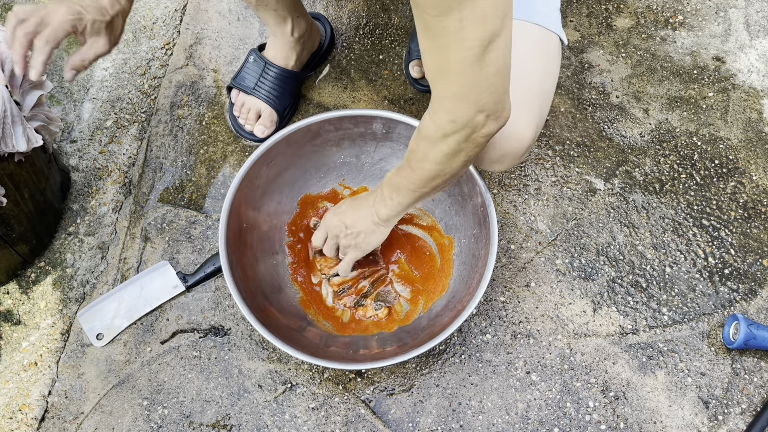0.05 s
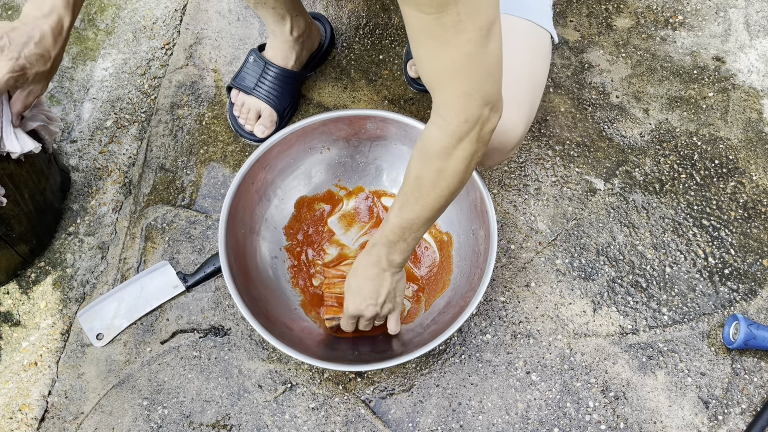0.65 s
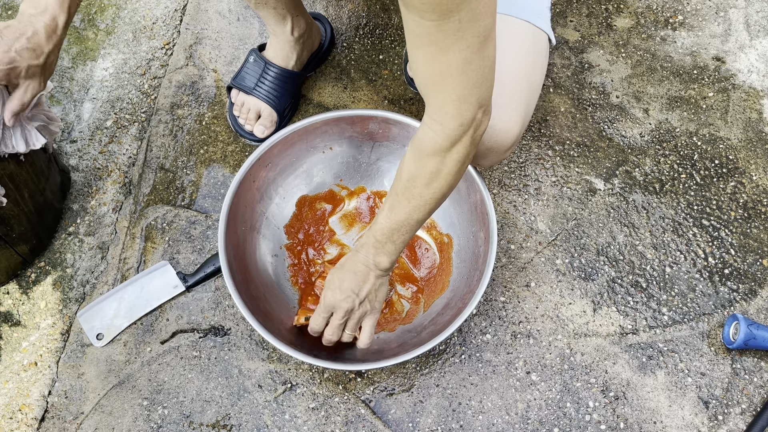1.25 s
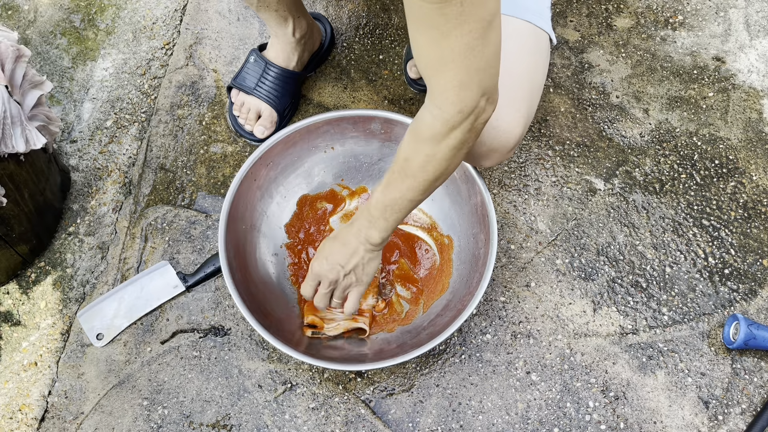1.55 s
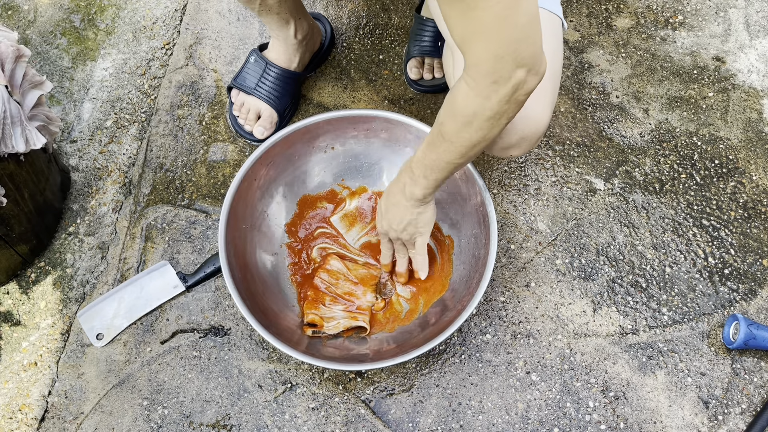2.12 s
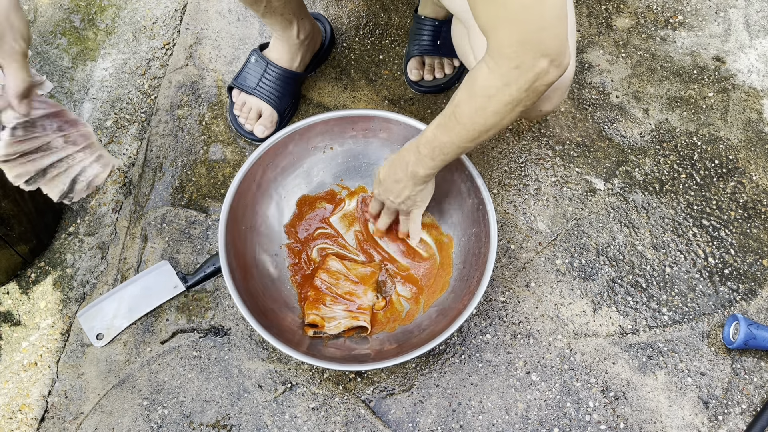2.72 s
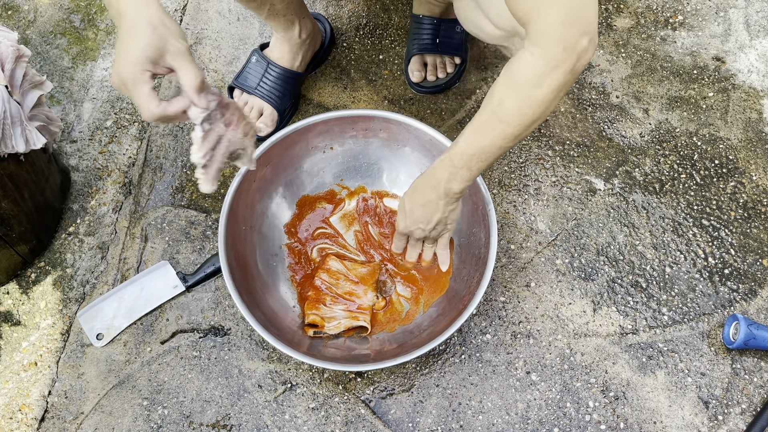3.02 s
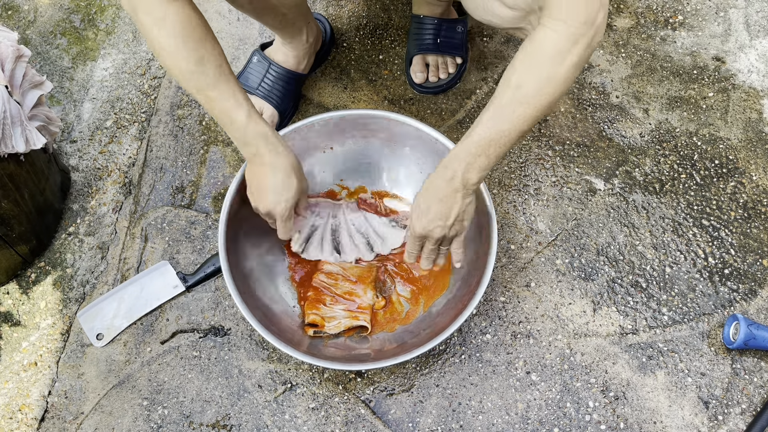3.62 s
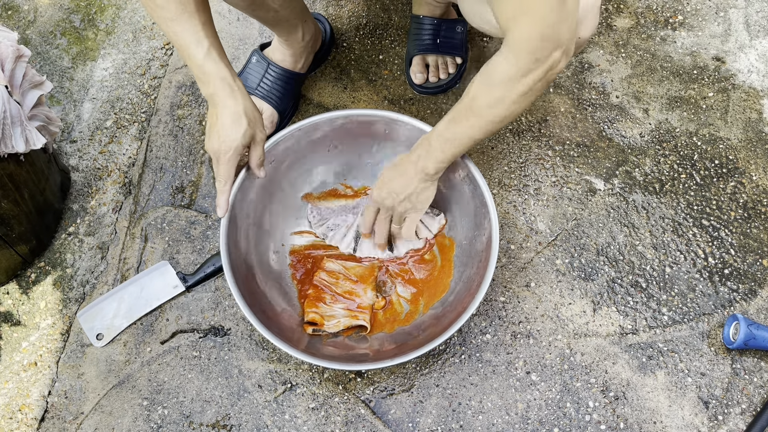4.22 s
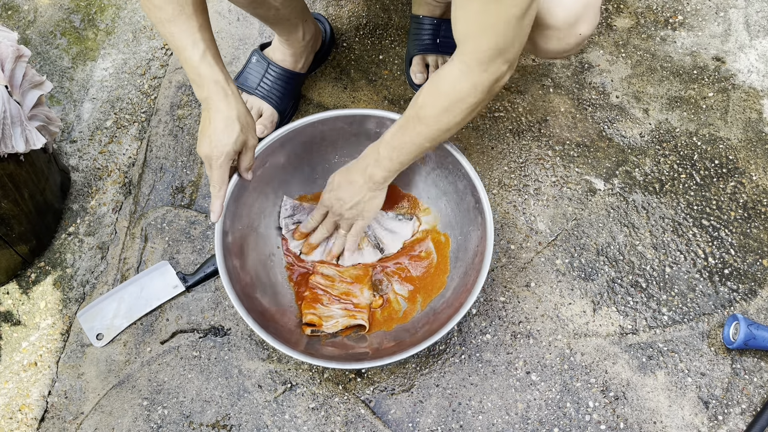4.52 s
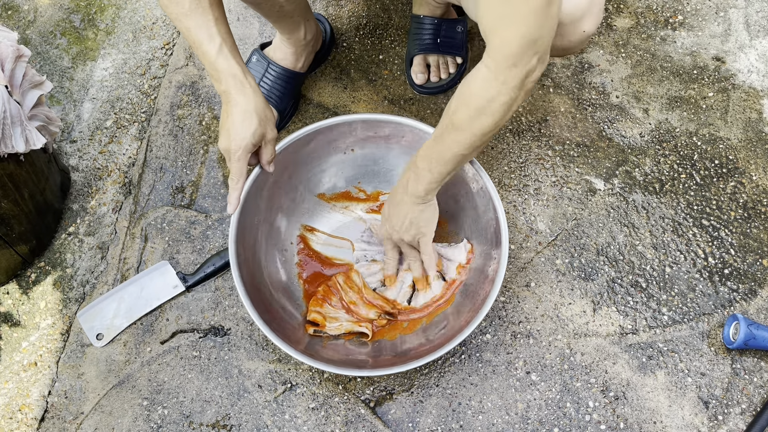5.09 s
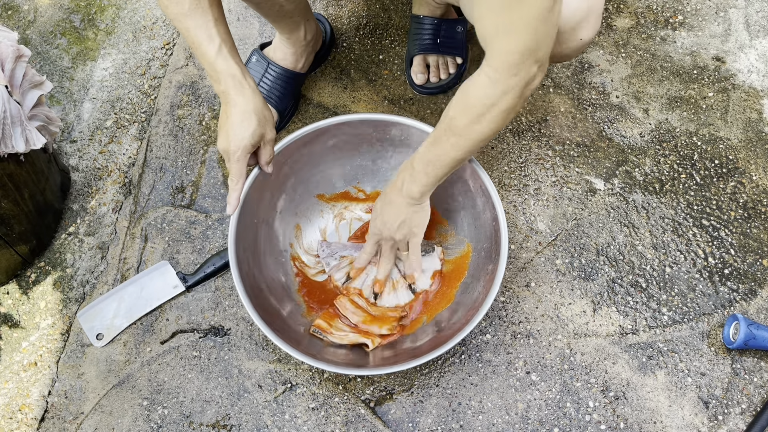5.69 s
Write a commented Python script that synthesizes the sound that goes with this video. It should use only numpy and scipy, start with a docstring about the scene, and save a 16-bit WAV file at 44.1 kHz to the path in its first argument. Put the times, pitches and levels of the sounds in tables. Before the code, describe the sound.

Outdoors, a microphone sits just above a wide steel bowl where hands turn fish slices in a wet marinade. A low rumble of open air and a faint, wavering distant engine run throughout. From the start, close sticky smacks, squelches and small air pops come irregularly, slightly to the left, each with a very short metallic ring. Sharper wet clicks stand out at about 0.6 and 0.9 seconds. High insects swell in the background after one second and fade by about 2.7. The hands ease to soft wet wipes around 2 seconds, then resume with a pop at 2.8. The loudest cluster of smacks and snaps lands at about 3.5 seconds. The insects return stronger by then, with a pulsing shrill and buzz that holds to the end. More squelches and pops follow, notably around 4.8 and 5 seconds, with a last pop near 5.6.

```python
"""Outdoors, a microphone just above a wide steel bowl, where hands turn fish slices in a wet marinade.
A distant engine drones from the start. Close up, sticky flesh smacks and squelches and trapped air pops,
each sound ringing briefly in the steel. Insects swell in the background after a second, and fade as
the hands ease off and resume. The loudest smacks come at about 3.5 s; the insects return stronger and
shrill on behind the last pops."""
import sys
import numpy as np
from scipy import signal
from scipy.fft import rfft, irfft, next_fast_len
from scipy.io import wavfile
from scipy.ndimage import uniform_filter1d, map_coordinates

SR = 44100
rng = np.random.default_rng(int(sys.argv[2]) if len(sys.argv) > 2 else 0)


def wav_record(signal):
    """Record a signal, one row per channel, as 16-bit PCM in the file named by sys.argv[1]."""
    frames = np.transpose(np.atleast_2d(signal))
    bounded = np.clip(frames, -1, 1)
    # unit amplitude maps onto the largest positive 16-bit level
    quanta = np.round(bounded * 32767).astype(np.int16)
    wavfile.write(sys.argv[1], SR, quanta)


N = 253575


def amp(db):
    """Decibels to gain."""
    return 10 ** (np.asarray(db) / 20)


def unit(x):
    """Scale to rms 1."""
    return x / np.sqrt(np.mean(x ** 2) + 1e-20)


def along(points, hz):
    """Interpolate (Hz, value) points on a log axis."""
    f, v = np.transpose(points)
    return np.interp(np.log(hz + 1), np.log(f + 1), v)


def curves(rows):
    """One value per sample for each column after the time."""
    s, *cols = np.transpose(rows)
    return [np.interp(np.arange(N) / SR, s, c) for c in cols]


def wobble(rate):
    """A smooth random curve, rate knots a second."""
    return map_coordinates(rng.standard_normal(2000), [np.arange(N) * rate / SR], mode="wrap")


def filtered(x, response):
    """Shape x by a response of frequency."""
    n = x.shape[-1]
    m = next_fast_len(n + 8192)
    return irfft(rfft(x, m) * response(np.fft.rfftfreq(m, 1 / SR)), m)[..., :n]


def lowpass(x, edge_hz, order):
    """Roll off the treble above an edge."""
    return filtered(x, lambda hz: 1 / (1 + (hz / edge_hz) ** order))


def sharpest_click(gain_db, size=1024):
    """The minimum-phase click with a given spectrum."""
    cepstrum = irfft(np.log(amp(gain_db(np.fft.rfftfreq(size, 1 / SR)))))
    cepstrum[1:size // 2] *= 2
    cepstrum[size // 2 + 1:] = 0
    return irfft(np.exp(rfft(cepstrum)))


def add(track, s, sound):
    """Mix a sound into a track at time s."""
    part = track[max(round(s * SR), 0):][:len(sound)]
    part += sound[:len(part)]


def stereo_noise(spectrum, side_db):
    """Noise of rms 1; (Hz, dB) points set its spectrum and its side level against the mid."""
    mid, side = filtered(rng.standard_normal((2, N)), lambda hz: amp(along(spectrum, hz)))
    side = filtered(side, lambda hz: amp(along(side_db, hz)))
    return unit(np.array([mid + side, mid - side]))


def off_centre(x, lead_samples):
    """The sound reaches the left microphone slightly before the right."""
    return filtered(x, lambda hz: np.exp(1j * np.pi * hz / SR * lead_samples * np.array([[1], [-1]])))


# The open air all around. Each row: frequency in Hz, relative level in dB.
AIR_SPECTRUM = [(20, -28), (35, -15.5), (55, -2), (90, -4.5), (135, -6), (180, -17), (300, -21.5),
                (700, -27), (1500, -37.5), (3500, -43.5), (7000, -54), (9000, -43), (10500, -85),
                (13000, -96)]


def outdoor_air():
    """A low rumble in the centre under a faint, wide hiss."""
    side_db = [(50, -31), (125, -13.5), (250, -10), (1000, 2), (8000, -3.5)]
    return amp(-48) * stereo_noise(AIR_SPECTRUM, side_db)


# An engine, far off. Each row: time in seconds, cycle rate in Hz, then the relative levels in dB
# of the drone and of its lowest note.
ENGINE_RUN = [(0, 37.94, -52, -62), (0.43, 36.38, -49, -39), (0.85, 37.28, -54.5, -57),
              (2.1, 37.81, -51.5, -52), (2.5, 37.89, -52, -73), (2.85, 38.57, -48.5, -80),
              (3.28, 38.24, -46.5, -56), (3.55, 38.23, -55, -53.5), (4.5, 38.6, -63.5, -46.5),
              (4.87, 37.54, -49.5, -53), (5.75, 37.6, -64, -52)]


def engine(waver_db=2.5, unsteady=0.011):
    """Only orders 2 to 5 of a far, unsteady engine carry, each wavering on its way."""
    cycle_hz, drone_db, lowest_db = curves(ENGINE_RUN)
    turns = np.cumsum(cycle_hz * (1 + unsteady * wobble(6))) / SR
    out = np.zeros(N)
    for order, db in [(2, lowest_db - 3), (3, drone_db + 1.5), (4, drone_db - 8), (5, drone_db - 16)]:
        level = np.sqrt(2) * amp(db + waver_db * wobble(12))
        out += level * np.sin(2 * np.pi * order * turns + .5 * wobble(10))
    return out


# The insects' phrases. Each row: end of the swell and start of the fade in seconds, relative levels
# of shrill and buzz in dB, whine pitch in Hz.
INSECT_PHRASES = [(1.4, 2.165, -61, -62.5, 7870), (2.9, 3.048, -70, -69.5, 8380),
                  (3.756, 5.748, -56, -63, 8360)]


def phrases(swell_s=0.72, fade_s=0.69, crescendo_db_per_s=3, chorus_db=-66.5):
    """Strength of shrill and buzz: phrases swell, grow while held and fade; a far chorus never stops."""
    t = np.arange(N) / SR
    shrill, buzz = np.zeros((2, N))
    for start, end, shrill_db, buzz_db, _ in INSECT_PHRASES:
        gate = np.clip(1 + (t - start) / swell_s, 0, 1) * np.clip(1 - (t - end) / fade_s, 0, 1)
        held = amp(crescendo_db_per_s * np.clip(t - start, 0, end - start))
        shrill += amp(shrill_db) * held * gate
        buzz += amp(buzz_db) * held * gate ** 2
    return np.hypot(shrill, amp(chorus_db)), buzz


# Each row: frequency in Hz, relative level in dB.
SHRILL_SPECTRUM = [(2500, -16), (4000, -13), (5500, -11), (6800, -7), (7600, -8), (8300, -7), (9000, -3),
                   (9600, -9), (10300, -17), (11300, -9.5), (12000, -43), (13000, -95)]


def far_insects(pulse_hz=20.8, whine_db=-7.5):
    """A high shrill swells and fades; a narrow, pulsing whine stands out as the song gets louder."""
    song, _ = phrases()
    whine_hz, = curves([(s, hz) for start, end, _, _, hz in INSECT_PHRASES for s in (start, end)])
    pulse = np.sin(2 * np.pi * np.cumsum(pulse_hz * (1 + .02 * wobble(3))) / SR)
    fuzz = unit(lowpass(rng.standard_normal(N), edge_hz=110, order=2))
    whine = np.sqrt(2) * fuzz * np.sin(2 * np.pi * np.cumsum(whine_hz) / SR) * (1 + 0.39 * pulse)
    effort = np.interp(20 * np.log10(song), [-65, -54], [0, 1])
    hiss = stereo_noise(SHRILL_SPECTRUM, side_db=[(4000, -3.5), (8000, -25)])
    shrill = unit(hiss + amp(whine_db) * effort * whine)
    return off_centre(shrill * song * amp(0.5) * (1 + 0.14 * pulse), lead_samples=1.305)


def resonances(modes, hz):
    """Summed response of (Hz, width Hz, dB) modes."""
    return sum(amp(db) * 1j * hz * width / (centre ** 2 - hz ** 2 + 1j * hz * width)
               for centre, width, db in modes)


# One insect nearer the microphone. Each row: centre and width in Hz, gain in dB, all before squaring.
BUZZ_MODES = [(2530, 130, 2.5), (3440, 90, -24), (4540, 150, -1), (5930, 270, 1), (6600, 320, 2.5),
              (7420, 450, 4), (7930, 320, 4)]


def near_insect():
    """A buzz in a few narrow bands comes and goes with the phrases."""
    _, song = phrases()
    bands = filtered(rng.standard_normal(N), lambda hz: abs(resonances(BUZZ_MODES, hz)) ** 2)
    buzz = unit(lowpass(bands, edge_hz=11000, order=24))
    return off_centre(buzz * song, lead_samples=0.26)


# The steel bowl's resonances. Each row: centre in Hz, width in Hz, relative gain in dB.
BOWL_MODES = [(421, 36, 7), (542, 67, -1.5), (717, 88, 5.5), (1210, 160, -10), (1810, 470, 0),
              (2870, 660, -0.5), (4030, 244, 7), (4600, 700, 4)]
# Its short ring. Each row: frequency in Hz, seconds to fall by 60 dB.
BOWL_DECAY = [(300, 0.071), (1700, 0.086), (3300, 0.09), (4400, 0.1), (6000, 0.11), (12000, 0.098)]


def bowl_tail(shift=0.016, size=10000):
    """One mid and side answer of the bowl, whose resonances shift with the load of hand and fish."""
    hz, t, spectra = signal.stft(rng.standard_normal((2, size)), SR, nperseg=128)
    fade = amp(-60 * t / along(BOWL_DECAY, hz)[:, None])
    _, tail = signal.istft(spectra * fade, SR, nperseg=128)
    tail /= np.linalg.norm(tail[0])
    load = 1 + shift * rng.uniform(-0.93, 1)
    return filtered(tail, lambda f: 0.81 + amp(3) * resonances(BOWL_MODES, f * load))


def bowl(x, echo_db=-5, width=0.56, left_bias_db=2.5, block=8000):
    """Sound bounces around the steel and up to the microphone, on paths that change as the hands move."""
    mid, side = np.zeros((2, N))
    for start in range(0, N, block):
        answer = signal.fftconvolve(x[None, start:start + block], bowl_tail(), axes=1)
        add(mid, start / SR + 0.001516, answer[0])
        add(side, start / SR + 0.00133, answer[1])
    echo = np.array([mid + width * side, mid - width * side])
    echo = lowpass(echo, edge_hz=8000, order=4)  # the fish soaks up the treble
    return (x + amp(echo_db) * echo) * amp([[left_bias_db / 2], [-left_bias_db / 2]])


def bubbles(times, hz, gains, cycles, size=400):
    """Tiny rings, one for each bursting bubble, falling to 1/e in the given cycles."""
    age = np.arange(size) * np.clip(hz, 200, 12000)[:, None] / SR
    rings = gains[:, None] * np.sin(2 * np.pi * age) * np.exp(-age / cycles)
    where = (np.clip(times, 0, None) * SR).astype(int)[:, None] + np.arange(size)
    return np.bincount(where.ravel(), rings.ravel(), N)[:N]


# The hand pushes the slices along. Each row: peak time and half length in seconds, relative level in dB.
HAND_STROKES = [(0.439, .2, -59), (1.294, .25, -62.5), (1.83, 0.087, -60.5), (2.863, .2, -59.5),
                (3.385, .16, -57.5), (4.629, .15, -60), (5.181, .07, -50.5)]


def hand_motion(rest_db=-67):
    """Each push swells and ebbs; the slices never lie quite still."""
    t = np.arange(N) / SR
    pushes = sum(amp(db) * np.exp(-((t - s) / half) ** 2) for s, half, db in HAND_STROKES)
    return amp(rest_db) + pushes


def sliding(pitch_hz=1500, octaves=0.75, uneven_db=5, clump_db=3, count=1800):
    """Flesh slides through the sauce with a fine, clumpy crackle."""
    pitch, strength = rng.standard_normal((2, count))
    times = rng.uniform(0, N / SR, count)
    gains = amp(uneven_db * np.clip(strength, -2, 2))
    crackle = bubbles(times, pitch_hz * 2 ** (octaves * pitch), gains, cycles=0.96)
    clumps = amp(clump_db * wobble(24.62))
    return amp(-6) * hand_motion() * unit(crackle * clumps)


def bubble_crowds(rows, rise_share, octaves, cycles, uneven_db, lead_in, count):
    """Each crowd swells from a few faint bubbles; its pitch slides as the gap under the flesh changes."""
    out = np.zeros(N)
    for s, length, db, hz, glide in rows:
        place, pitch, strength = rng.standard_normal((3, count))
        stretch = 1 + lead_in * np.clip(-place, 0, 2)  # early bubbles come sparser and softer
        lag = place * length * np.where(place < 0, rise_share * stretch, 1 - rise_share)
        gains = amp(uneven_db * np.clip(strength, -2, 2)) / stretch
        crowd = bubbles(s + lag, hz * 2 ** (glide * lag + octaves * pitch), gains, cycles)
        out += amp(db) * crowd * np.sqrt(length * SR / (np.sum(crowd ** 2) + 1e-12))
    return out


# Three kinds of small wet sound, close up. Each row: peak time and length in seconds,
# relative level in dB, pitch in Hz, glide in octaves per second.
SAUCE_SQUELCHES = [(0.055, 0.04, -49.5, 2050, 3.5), (0.398, 0.032, -55, 990, -7),
                   (4.085, 0.065, -56, 2260, 9), (4.495, 0.041, -52.5, 1730, 10),
                   (4.64, 0.04, -56, 1910, -7), (4.738, .032, -43, 1900, -2.5),
                   (4.768, 0.018, -42, 1510, -11), (5.034, 0.028, -40, 1296, -6.5),
                   (5.468, 0.036, -54, 1390, 0)]
FINGER_WIPES = [(2.222, 0.041, -53.5, 2920, 10), (2.54, 0.03, -51.5, 3450, 3), (4.365, 0.06, -57, 3840, 5)]
SAUCE_FIZZ = [(0.905, 0.028, -51, 4800, 0), (0.975, 0.023, -57, 4650, 0), (1.362, 0.026, -54.5, 4502, 0),
              (3.595, 0.037, -54, 4450, 0.0004)]


def sauce():
    """Sauce squelches out under the fingers, is wiped softly over the flesh and fizzes on the steel."""
    squelches = bubble_crowds(SAUCE_SQUELCHES, rise_share=0.55, octaves=0.54, cycles=2.1,
                              uneven_db=5, lead_in=0.9, count=120)
    wipes = bubble_crowds(FINGER_WIPES, rise_share=0.5, octaves=0.53, cycles=1.25,
                          uneven_db=1.5, lead_in=0.4, count=600)
    fizz = bubble_crowds(SAUCE_FIZZ, rise_share=0.32, octaves=0.15, cycles=6.3,
                         uneven_db=1, lead_in=0.14, count=400)
    return squelches + wipes + fizz


# Air pockets burst among the slices. Each row: start in seconds, relative level in dB, pitch in Hz.
AIR_POCKETS = [(0.353, -20, 463), (0.394, -30, 880), (0.405, -43, 540), (0.453, -25.5, 520),
               (0.569, -35, 2800), (0.605, -29.5, 1410), (0.711, -38, 1800), (0.889, -19.5, 4520),
               (1.133, -34, 1790), (1.259, -31.5, 1830), (1.35, -23, 4340), (1.707, -33.5, 1430),
               (1.812, -33, 1780), (2.625, -32.5, 1766), (2.806, -17.5, 960), (2.807, -29, 4100),
               (2.867, -29, 670), (3.012, -33, 1410), (3.166, -33, 1740), (3.218, -34, 1730),
               (3.333, -29, 650), (3.381, -36, 1828), (3.406, -33.5, 1860), (3.554, -24, 900),
               (3.562, -14, 4200), (3.568, -19.5, 770), (3.619, -32, 1650), (3.791, -26, 1550),
               (4.033, -35, 1722), (4.280, -28.5, 2300), (4.297, -28, 770), (4.693, -35, 1700),
               (4.777, -17, 553), (4.789, -28, 410), (5.029, -20, 1148), (5.056, -20.5, 685),
               (5.257, -29, 447), (5.258, -29, 4470), (5.571, -17.5, 650), (5.700, -32, 1300)]


def pops(rise=0.019, flutter=0.077, size=3000):
    """A soft air pocket swells within a cycle, rings unsteadily and rises in pitch as it opens."""
    out, t = np.zeros(N), np.arange(size) / SR
    for s, db, hz in AIR_POCKETS:
        t60 = 0.008 * (1000 / hz) ** 0.45  # higher pockets die sooner
        tremble = flutter * unit(uniform_filter1d(rng.standard_normal(size), size=24))
        opening = rise * (.5 - np.exp(-4 * t / t60))
        turns = np.cumsum(hz * (1 + opening + tremble)) / SR
        envelope = amp(-60 * t / t60) * (1 - np.exp(-hz * t))
        add(out, s, amp(db) * envelope * np.sin(2 * np.pi * turns))
    return out


# Taut films of sauce. Each row: start in seconds, relative level in dB, band centre in Hz.
FILM_SNAPS = [(0.467, -36.5, 8500), (0.555, -17, 9500), (0.556, -18.5, 2780), (0.889, -30.5, 8400),
              (1.040, -35, 10500), (1.351, -26, 3290), (1.351, -34, 9600), (1.708, -33.5, 2480),
              (1.788, -26, 2780), (1.791, -33, 3470), (3.559, -20, 7850), (3.5613, -7.5, 8140),
              (3.5622, -13, 4100), (3.566, -15, 11400), (3.5647, -31, 7200), (3.638, -26, 9400),
              (4.725, -33, 8500), (4.758, -33, 2800), (5.041, -37, 2500), (5.257, -26, 4970),
              (5.257, -30, 10500)]


def snaps(t60=0.0053, octaves=0.22, skirt_db=-23, size=1000):
    """A taut film breaks with a sharp, toneless click; smaller films sound higher."""
    out, t = np.zeros(N), np.arange(size) / SR
    for s, db, hz in FILM_SNAPS:
        edge_hz = np.interp(db, [-30, -15], [10500, 12800])  # harder snaps reach higher
        hump = lambda f: amp(skirt_db) + np.exp(-.5 * (np.log2((f + 1) / hz) / octaves) ** 2)
        click = sharpest_click(lambda f: 20 * np.log10(hump(f) / (1 + (f / edge_hz) ** 24)))
        burst = rng.standard_normal(size) * amp(-60 * t / t60)
        snap = signal.fftconvolve(burst, click)
        add(out, s, 2 * amp(db) * snap / np.linalg.norm(snap))
    return out


def faint_smacks(db=-45.5, brightness=-1.3, count=14):
    """Rows for faint smacks at random, most often where the hand moves most."""
    travel = np.cumsum(hand_motion())
    place, strength, colour = rng.uniform(-1, 1, (count, 3)).T
    shares = (np.arange(count) + .5 + .5 * place) / count
    times = np.searchsorted(travel / travel[-1], shares) / SR
    return list(zip(times, db + 3 * strength, brightness + 4 * colour))


# Flesh slaps down or peels off, right under the microphone. Each row: start in seconds,
# relative level in dB, brightness in dB per octave.
FLESH_SMACKS = [(0.279, -37, 0), (0.350, -27, -8), (0.538, -30, 2), (0.556, -29, 1.5), (0.565, -34, 0),
                (0.605, -35, 0), (0.711, -31.5, -2), (0.770, -35, -4.5), (0.873, -30.5, 2.5),
                (1.133, -41, 4.5), (1.259, -38.5, 4.5), (1.311, -35.5, -1), (1.707, -38.5, 3),
                (1.788, -30.5, -1), (1.811, -33, -0.5), (2.624, -33.5, 1), (2.770, -31, -5.5),
                (2.785, -32.5, 3), (2.798, -31.5, 4), (2.807, -26, 2.5), (2.841, -38, 5),
                (2.868, -34.5, -3), (2.950, -32, -4), (2.962, -33, -2), (3.009, -37.5, -1.5),
                (3.145, -37, -2), (3.165, -30, 2.5), (3.217, -36.5, 1), (3.333, -35, -1.5), (3.361, -43, 1),
                (3.38, -39, 4), (3.406, -34.5, -0.5), (3.426, -30.5, -6), (3.455, -34, -5), (3.484, -36, 5),
                (3.514, -25.5, 1.5), (3.524, -32, 5), (3.530, -36, 14), (3.551, -23.5, -0.5),
                (3.563, -21.5, 1), (3.567, -18, 4), (3.617, -36, 2), (3.636, -23.5, -2),
                (3.791, -33.5, 5.5), (4.031, -31, -1), (4.060, -36, 5.5), (4.082, -37, 6), (4.134, -33, -6),
                (4.189, -37, -4), (4.225, -41, -5), (4.279, -29.5, -3), (4.297, -29, -2), (4.618, -34, 2),
                (4.633, -34, 7), (4.693, -32.5, 3), (4.728, -33, 2), (4.757, -29, 0), (4.775, -28, -6),
                (5.022, -28.5, -2), (5.041, -35, 2.5), (5.178, -36, -9), (5.257, -38, 4), (5.571, -32, 3)]
# The tone of wet flesh. Each row: frequency in Hz, relative level in dB.
FLESH_SPECTRUM = [(200, -11.5), (380, 0), (520, -0.5), (750, 1), (1200, -6), (1800, -4.5), (3000, -11.5),
                  (4500, -18), (6500, -22), (10000, -27.5), (12000, -58), (14000, -90)]


def smacks(spiky=0.79, peel_s=0.0009, tear_s=0.0021, size=2600):
    """The film of sauce on the flesh tears in a quick, dying run of tiny clicks."""
    out, t = np.zeros(N), np.arange(size) / SR
    envelope = (1 - np.exp(-t / peel_s)) * np.exp(-t / tear_s)
    for s, db, brightness in FLESH_SMACKS + faint_smacks():
        tears = rng.standard_normal(size) * np.exp(spiky * rng.standard_normal(size))
        tone_db = lambda hz: along(FLESH_SPECTRUM, hz) + brightness * np.log2((hz + 200) / 1500)
        smack = signal.fftconvolve(tears * envelope, sharpest_click(tone_db))
        add(out, s, amp(db + 10.5) * smack / np.linalg.norm(smack))
    return out


def scene():
    """The wet work in the bowl, close and a little left, over the outdoor background."""
    covered = lowpass(sauce() + pops() + sliding(), edge_hz=9500, order=8)  # flesh muffles the bubbles
    hands = off_centre(bowl(smacks() + snaps() + covered), lead_samples=0.7)
    return outdoor_air() + far_insects() + near_insect() + engine() + amp(-3) * hands


def record(dry, ceiling=0.26):
    """The camera held above the bowl rounds off the highest peaks and cuts the top of the treble."""
    rounded = dry / (1 + (abs(dry) / ceiling) ** 6) ** (1 / 6)
    return lowpass(rounded, edge_hz=16200, order=80)


dry = scene()
out = record(dry)
wav_record(out)
```